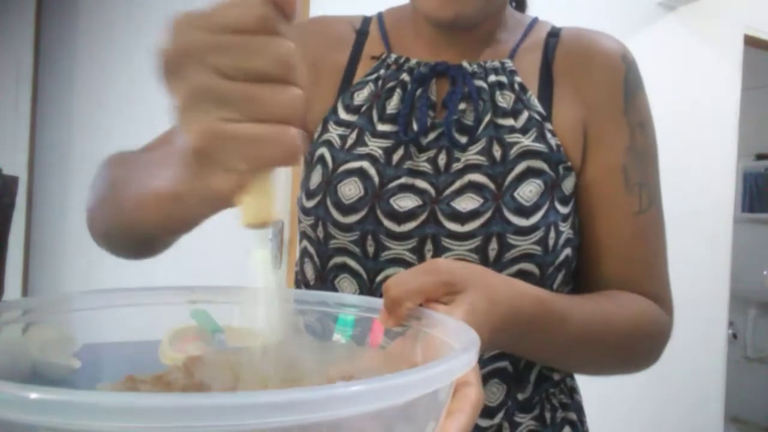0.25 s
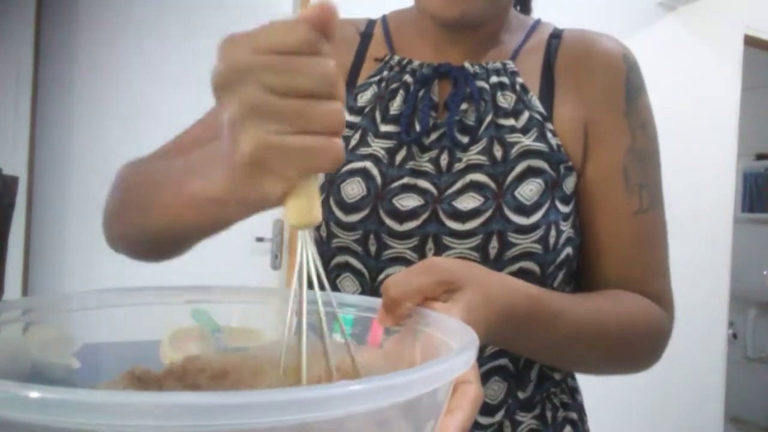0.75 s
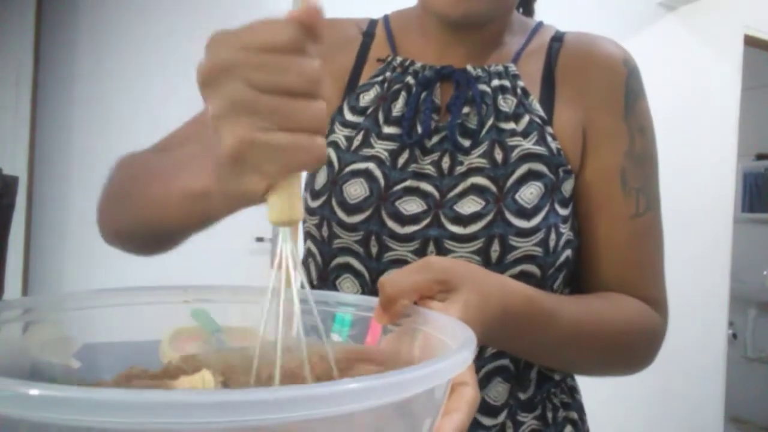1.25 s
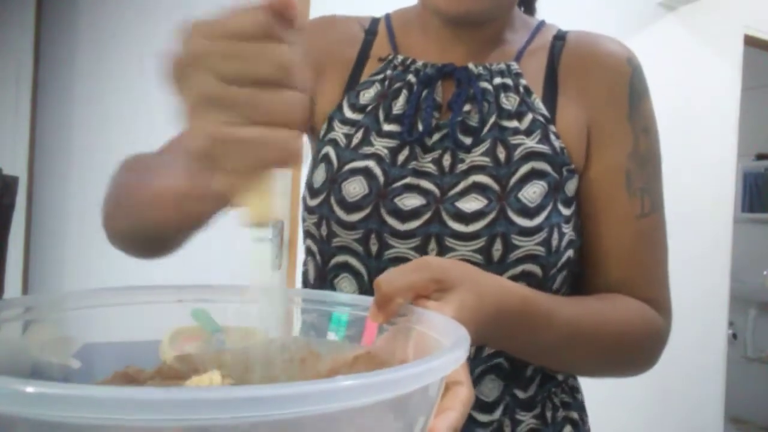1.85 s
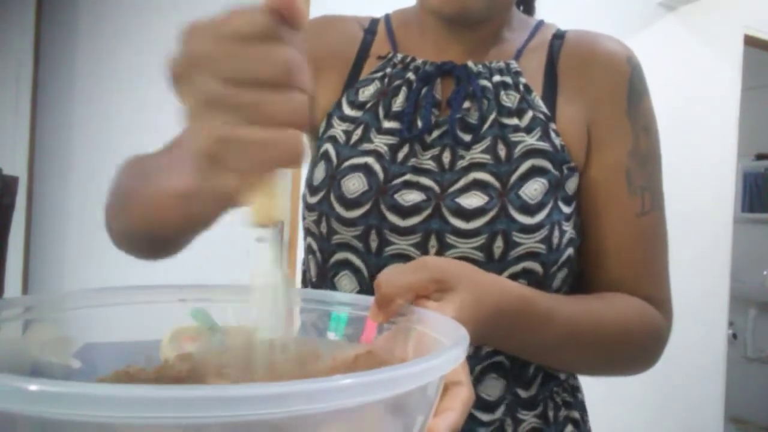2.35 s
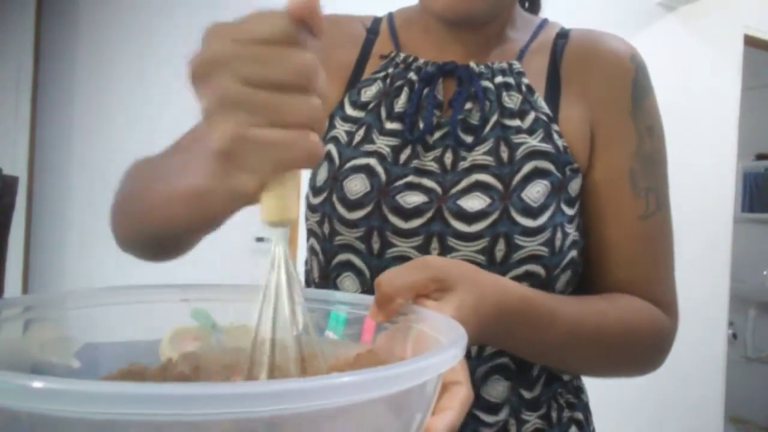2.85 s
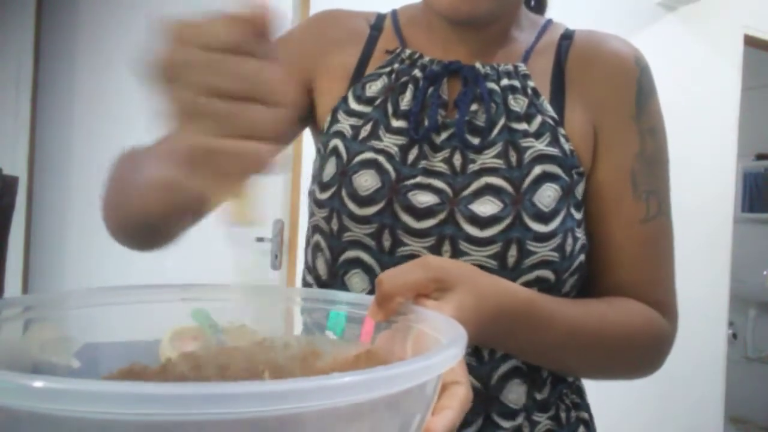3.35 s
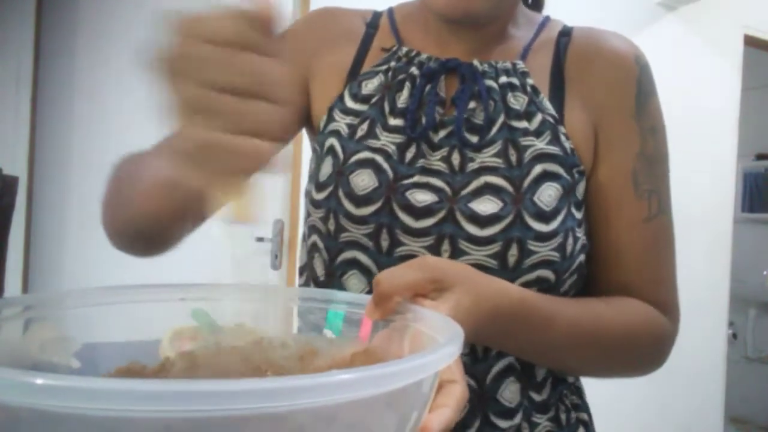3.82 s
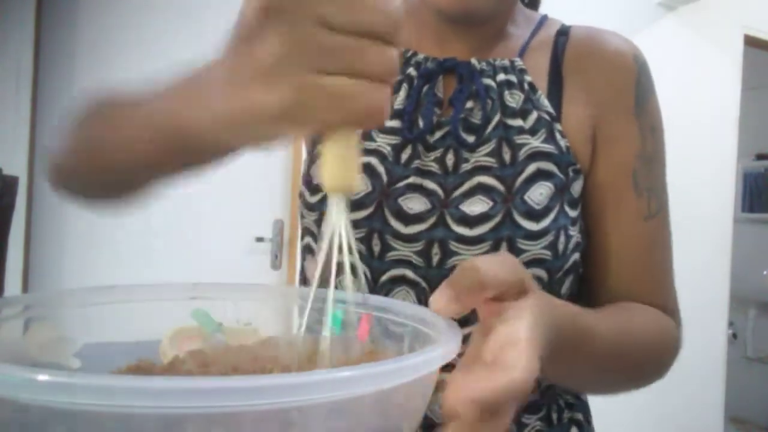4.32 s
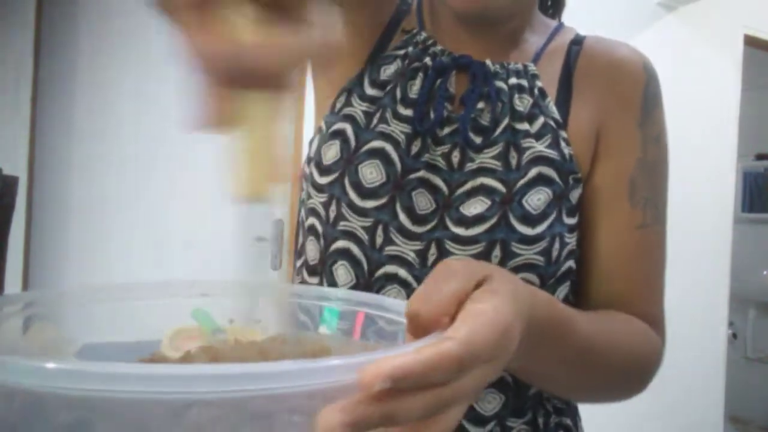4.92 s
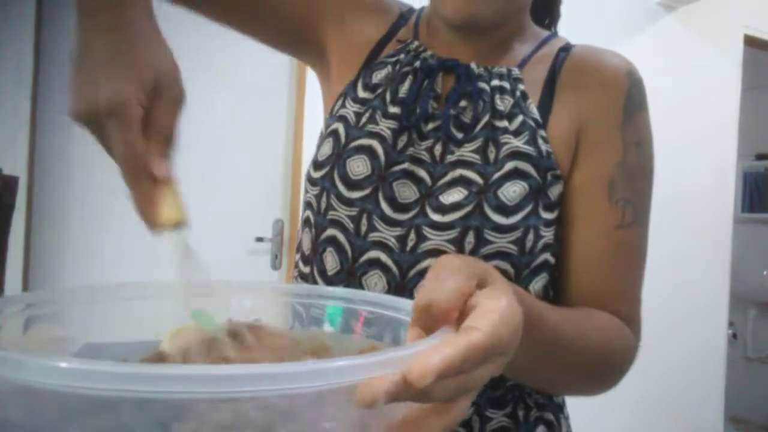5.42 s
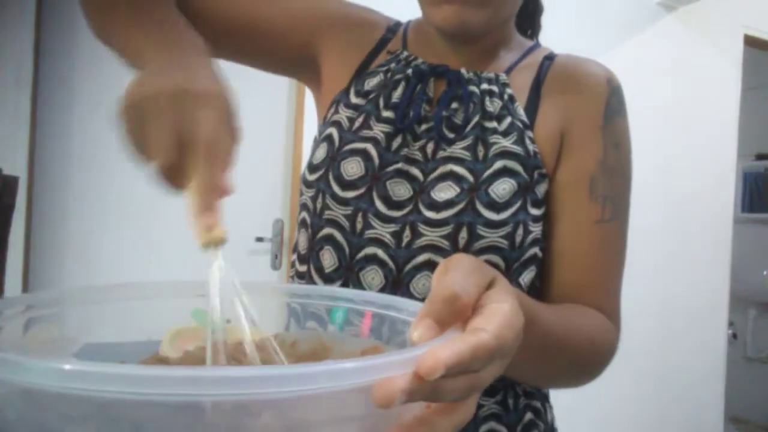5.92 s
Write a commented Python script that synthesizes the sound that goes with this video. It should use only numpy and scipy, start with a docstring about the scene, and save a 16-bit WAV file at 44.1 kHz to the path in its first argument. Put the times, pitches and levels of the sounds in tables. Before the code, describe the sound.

Hand whisking in a plastic bowl: bright metallic clicks, short hissing scrapes and dull hollow knocks, sparse at first, sharper and louder near the end.

```python
"""In a hard-walled kitchen, a wire whisk stirs batter in a plastic bowl close to a one-microphone camera.
Wires tick (shaped noise bursts) and scrape (uneven hiss) on the wall, which sings on one mode as it is rubbed;
the bowl knocks as decaying sines at its modes, and the room rings on as decaying noise.
Under it lie household noise and a mains hum that dies away. A noise suppressor pushes the noise down
and chops the tails; a noisy left-right difference is heard in the treble in random patches."""
import sys
import numpy as np
from scipy import signal
from scipy.fft import rfft, irfft
from scipy.io import wavfile
from scipy.ndimage import uniform_filter1d

SR = 44100
rng = np.random.default_rng(int(sys.argv[2]) if len(sys.argv) > 2 else 0)


def inscribe(sig):
    """Save sig as 16-bit PCM at rate SR to the path in sys.argv[1].

    A 1-D sig is mono; a 2-D sig holds one channel per row.
    Samples are clipped to [-1, 1] before scaling.
    """
    pcm = np.round(np.clip(np.atleast_2d(sig).T, -1, 1) * 32767)
    wavfile.write(sys.argv[1], SR, pcm.astype(np.int16))


def natural_amplitude(level_db):
    """Convert a level in decibels to a linear amplitude factor, elementwise."""
    exponent = np.asarray(level_db, float) / 20
    return 10 ** exponent


N = 272097
T = np.arange(N) / SR


def colour(x, points):
    """Linear filtering: weights the spectrum by (Hz, dB) points joined along log frequency."""
    hz, db = np.transpose(points)
    f = np.maximum(np.arange(len(x) // 2 + 1) * SR / len(x), 1)
    gain = natural_amplitude(np.interp(np.log(f), np.log(hz), db))
    return irfft(rfft(x) * gain, len(x))


def unit(x):
    """Normalisation of power: scales to rms 1."""
    return x / np.sqrt(np.mean(x ** 2))


def band(x, lo_hz, hi_hz, order=2):
    """Band limitation by a Butterworth filter."""
    edges = [lo_hz, min(hi_hz, SR / 2.2)]
    return signal.sosfilt(signal.butter(order, edges, "band", fs=SR, output="sos"), x)


def add(out, start_s, x):
    """Superposition: mixes x into out from start_s."""
    i = int(start_s * SR)
    out[i:i + len(x)] += x[:N - i]


def walk(rate):
    """Slow random modulation: chance levels held 1 / rate s and smoothed twice."""
    hold = int(SR / rate)
    steps = np.repeat(rng.standard_normal(N // hold + 1), hold)
    return uniform_filter1d(uniform_filter1d(steps, hold), hold)[:N]


def swells(start, length, db, rise_db_s, fall_db_s):
    """Exponential growth and decay: gain rises up to each start, holds its level for the length, then falls."""
    early = np.maximum(start[:, None] - T, 0)
    late = np.maximum(T - (start + length)[:, None], 0)
    return natural_amplitude(db[:, None] - rise_db_s * early - fall_db_s * late).sum(axis=0)


# Microphone and wire colour of ticks and scrape. Each row: frequency in Hz, relative level in dB.
WIRE_COLOUR = [(200, -74), (1500, -24.5), (2500, -16.5), (3500, -3.5), (5300, 4), (7000, -6), (10000, -13),
               (13000, -25.5), (16000, -33)]
# Wire contacts. Each row: time in seconds, peak of the direct sound in dB, relative room feed in dB,
# thinness as a tilt of the wire colour in dB per octave.
WIRE_TICKS = [(0.407, -32.5, -9, -6), (0.468, -33.5, -4, -4),  (0.665, -24, -7.5, -2),
              (0.779, -36, -1.5, -12), (1.5478, -31, -0.5, 2), (1.8189, -19, -48, -3),
              (1.8189, -18.5, -3, -2), (1.964, -32, -13, 2), (2.0624, -19, -0.5, -4.5),
              (2.074, -19, -28, -8.5),  (2.0798, -13, -25, -0.5),  (2.22, -21, -8.5, -4.5),
              (2.311, -18, -14, -3), (2.322, -18.5, -6.5, -1), (2.7902, -29, -6, -3),
              (2.803, -22.5, -8.5, 0), (2.822, -29, -4.5, 0.5), (3.11, -33, -8, 3), (3.163, -28.5, -6.5, 2),
              (3.1729, -30, -12, 7), (3.183, -31.5, -14, 4), (3.193, -35.5, -12, 7), (3.2077, -30, -18, 1),
              (3.3047, -31.5, -15, -1.5), (3.331, -36.5, -10, 0), (3.5504, -38.5, -18, -1),
              (3.6171, -36, -10, -1), (3.706, -32, -19, 6), (3.785, -30.5, -13.5, 7),
              (3.9693, -30.5, -0.5, -1), (4.0611, -20, -13, 6.5), (4.0775, -29, -6.5, -2),
              (4.339, -38, -39, 6.5), (4.4427, -19.5, -5, -3), (4.5804, -26.5, -9, -1.5),
              (4.601, -20.5, -7.5, 2.5), (4.6762, -5.5, -13, -3.5), (4.681, -15, -15, 1),
              (4.718, -20.5, -3.5, -12), (4.773, -25, -3, 0), (4.9045, -24.5, -14, 4),
              (5.1268, -47.5, -15, -33), (5.1293, -9, -20.5, 1), (5.1339, -13, -8.5, -3.5),
              (5.1988, -25.5, -3, 1), (5.3125, -24.5, -4.5, 1.5), (5.33, -21.5, -10, -5.5),
              (5.5023, -20.5, -5, -4.5), (5.6275, -36.5, -1.5, 1), (5.9086, -17, -3, -4.5),
              (6.1424, -30, -0.5, -1.5)]


def ticks():
    """Impact excitation: each contact is a snap with a fast decay, a faint noise heard just before it.
    Returns direct sound and room feed."""
    near, far = np.zeros(N), np.zeros(N)
    lead = 256 / SR  # seconds of faint noise ahead of the listed time
    t = T[:1024] - lead - 0.0015
    decay = np.exp(-np.abs(t) / 0.0005) + natural_amplitude(0.5) * np.exp(-np.abs(t) / 0.00054)
    faint_before = natural_amplitude(-7.5) * np.exp(t / 0.0025)
    shape = np.where(t > 0, decay, faint_before)
    hz, wire_db = np.transpose(WIRE_COLOUR)
    noises = rng.standard_normal((len(WIRE_TICKS), 1024))
    for (start, db, room_db, tilt_db), noise in zip(WIRE_TICKS, noises):
        tint = np.transpose([hz, wire_db + tilt_db * np.log2(hz / hz[0])])
        tick = colour(noise * shape, tint)
        tick = natural_amplitude(db) * tick / np.abs(tick).max()
        # the walls hear all directions: an even colour, from the phases alone
        phases_only = irfft(np.exp(1j * np.angle(rfft(tick))))
        even = unit(colour(phases_only, tint))
        # the first noise samples also set the chance levels of the loops
        rung = loops(tick, noise)
        add(near, start - lead, natural_amplitude(db) * rung / np.abs(rung).max())
        add(far, start - lead, natural_amplitude(room_db) * tick.std() * loops(even, noise))
    return near, far


# Modes of the whisk's wire loops. Each row: frequency in Hz, mean level in dB above the broad colour.
LOOP_MODES = [(3470, -28.5), (3770, -0.5), (4150, -4.5), (4600, -7.5), (5300, -3), (5620, -9), (6750, 0)]


def loops(x, chance):
    """Modal resonance: the wire loops ring briefly beside the broad colour; each contact favours other loops."""
    width_hz, scatter_db = 100, 3
    f = np.arange(len(x) + 1) * SR / len(x) / 2
    gain = 1
    for (hz, db), c in zip(LOOP_MODES, chance):
        gain = gain + natural_amplitude(db + scatter_db * c) / (1 + 2j * (f - hz) / width_hz)
    return irfft(rfft(x, 2 * len(x)) * gain * natural_amplitude(-4.5))


# Strokes of the wires along the wall. Each row: start in seconds, length in seconds, scrape level in dB,
# scrape centre in Hz, fizz level in dB.
WALL_STROKES = [(0.19, 0.092, -61, 5320, -62), (0.36, 0.12, -57.5, 5330, -63),
                (0.638, 0.06, -49, 5510, -64), (0.648, 0.051, -55.5, 3800, -78),
                (0.757, 0.21, -57, 5530, -59.5), (1.236, 0.11, -64, 5190, -66),
                (1.56, 0.11, -69, 5440, -65), (2.536, 0.086, -56, 5100, -65), (2.96, 0.062, -59, 4860, -63),
                (3.154, 0.1, -55, 5160, -63.5), (3.304, 0.26, -58.5, 4900, -64.5),
                (3.521, 0.42, -71.5, 4640, -75.5), (3.721, 0.13, -60, 5100, -69.5),
                (3.974, 0.066, -48.5, 4870, -56), (4.353, 0.061, -61, 5100, -69),
                (4.905, 0.036, -51.5, 2550, -98), (4.921, 0.178, -53, 5510, -62),
                (5.178, 0.23, -48, 5050, -65), (5.697, 0.094, -62, 5300, -65),
                (5.855, 0.11, -54, 5250, -58.5), (6.023, 0.16, -60, 5230, -65.5)]


def scrape():
    """Friction noise: dense uneven slips of wire on plastic; each stroke has its own hiss pitch, batter fizz on top."""
    rise_db_s, fall_db_s = 422, 195
    drop_db = 76  # one octave away from the scrape centre
    start, length, db, centre_hz, fizz_db = np.transpose(WALL_STROKES)
    uneven = np.minimum(rng.exponential(size=N // 16 + 1), 4).repeat(16)[:N]
    slips = rng.standard_normal(N) * natural_amplitude(3.84 * uneven)
    # each 400 Hz band flickers by itself
    slips = unit(sum(natural_amplitude(1.8 * walk(16)) * band(slips, f, f + 400) for f in np.arange(1800, 15500, 400)))
    # the fizz is brighter than the wire colour
    fizz = unit(colour(colour(slips, WIRE_COLOUR), [(5000, -16.5), (7500, 5.5), (16000, 11.5)]))
    out = fizz * swells(start, length, fizz_db, rise_db_s, fall_db_s)
    octaves = np.linspace(-2, 2, 33)
    for k in range(len(start)):
        first = max(int((start[k] - 0.2) * SR), 0)
        part = slice(first, int((start[k] + length[k] + 0.3) * SR))
        hump = np.transpose([centre_hz[k] * 2 ** octaves, -drop_db * octaves ** 2])
        hiss = unit(colour(slips[part], hump))
        one = slice(k, k + 1)
        press = swells(start[one], length[one], db[one], rise_db_s, fall_db_s)
        out[part] += hiss * press[part]
    return out


# Modes of the bowl. Each row: mean frequency in Hz, relative level in dB, t60 in seconds.
BOWL_MODES = [(370.7, 6.5, 0.041), (455, 11.5, 0.063), (540, -3, 0.15), (624.7, 9.5, 0.043),
              (672.7, -1, 0.055), (779.6, -3, 0.21), (900.3, 20.5, 0.037), (1325, 4, 0.05),
              (1521, 24, 0.014), (1780, 18.5, 0.01), (1930, 13.5, 0.027), (2148, 2, 0.14), (2259, 9, 0.019),
              (2708, 11, 0.029), (2810, 17, 0.032)]
# Knocks on the bowl. Each row: time in seconds, relative level of the low modes in dB, low centre in Hz,
# relative level of the upper modes and rattle in dB, upper centre in Hz.
BOWL_KNOCKS = [(0.407, -45, 380, -57, 1890), (0.655, -52, 1026, -48.5, 2040), (1.546, -44, 700, -54, 2900),
               (1.819, -32.5, 719.5, -43.5, 1460), (1.954, -39.5, 604, -46, 1146),
               (2.079, -39, 678, -51.5, 1700), (2.228, -42.5, 660, -47, 1290), (2.311, -45, 510, -40, 1810),
               (2.323, -36.5, 660, -81, 2120), (2.803, -36, 547, -43, 1960), (3.04, -48, 455, -52, 1470),
               (3.193, -41, 560, -47, 1060), (3.298, -43, 700, -57, 2360), (3.617, -38.5, 558, -50, 1630),
               (3.67, -44.5, 724, -56, 2050), (4.056, -45.5, 726, -47, 2050), (4.444, -33, 571, -51, 2440),
               (4.603, -46.5, 450, -47, 1610), (4.677, -31, 712, -38, 2120), (4.903, -45.5, 605, -40, 2620),
               (5.019, -45, 725, -46.5, 2560), (5.128, -30, 393, -30.5, 1870),
               (5.329, -46.5, 540, -43, 1980), (5.502, -40.5, 777, -45, 1780),
               (5.629, -48.5, 653, -50.5, 1540), (5.911, -30.5, 540, -29, 1750), (6.01, -46, 538, -51, 950)]


def knocks():
    """Modal excitation: the spot struck decides which wall modes ring, those near its low and upper centres."""
    out, t = np.zeros(N), T[:8192]
    hz, mode_db, t60 = np.array(BOWL_MODES).T[:, :, None]
    chances = rng.standard_normal((len(BOWL_KNOCKS), 2, len(BOWL_MODES), 1))
    noises = rng.standard_normal((len(BOWL_KNOCKS), len(t)))
    push = 1 - np.exp(-t / 0.001)  # batter softens the contact
    for (start, db, low_hz, up_db, up_hz), (detune, scatter), noise in zip(BOWL_KNOCKS, chances, noises):
        low = natural_amplitude(db - 1.5) * np.exp(-(np.log(hz / low_hz) / 0.16) ** 2)
        upper = natural_amplitude(up_db - 10) * np.exp(-(np.log(hz / up_hz) / 0.3) ** 2)
        level = (low + upper) * natural_amplitude(mode_db + 2.0 * scatter)
        rings = np.sin(2 * np.pi * hz * (1 + 0.019 * detune) * t) * np.exp(-np.log(1000) * t / t60)
        # the wires rattle briefly against the wall around the upper centre
        rattle = natural_amplitude(up_db + 13) * band(noise * np.exp(-t / 0.005), up_hz / 1.85, up_hz * 1.87)
        add(out, start, push * (np.sum(level * rings, axis=0) + rattle))
    return band(out, 347, 6800, order=3)  # a small bowl radiates little bass


# Singing of the rubbed wall. Each row: start in seconds, length in seconds, rms level in dB before flutter.
WALL_SINGS = [(0.241, 0.022, -57), (0.905, 0.09, -59), (1.385, 0.032, -58), (1.545, 0.12, -58.5),
              (2.225, 0.066, -52), (2.794, 0.13, -55.5), (3.488, 0.058, -53.5), (3.777, 0.17, -58),
              (3.986, 0.34, -59), (4.89, 0.07, -52), (5.123, 0.12, -52.5), (5.8, 0.13, -57.5)]


def sing():
    """Stick-slip self-oscillation: rubbing keeps one mode going; pitch wavers slightly, the level flutters."""
    centre_hz, waver_hz = 1362, 8
    phase = 2 * np.pi * np.cumsum(centre_hz + waver_hz * walk(30)) / SR
    tone = np.sqrt(2) * np.sin(phase)
    level = swells(*np.transpose(WALL_SINGS), rise_db_s=600, fall_db_s=191)
    return tone * level * natural_amplitude(1.5 * walk(50))


# Decay of the room. Each row: frequency in Hz, t60 in seconds.
ROOM_DECAY = [(300, 0.41), (1000, 0.68), (3000, 0.62), (6000, 0.42), (12000, 0.97)]


def room(x):
    """Diffuse reverberation: a noise tail dies at its own rate in each octave, building up over a few ms."""
    hz, t60 = np.transpose(ROOM_DECAY)
    t, tail = T[:SR // 2], 0
    for f in 250 * 2. ** np.arange(7):
        decay = np.exp(-np.log(1000) * t / np.interp(np.log(f), np.log(hz), t60))
        tail = tail + band(rng.standard_normal(len(t)), f / np.sqrt(2), f * np.sqrt(2)) * decay
    tail = tail * (1 - np.exp(-t / 0.0045))
    return signal.fftconvolve(x, tail / np.sqrt(np.sum(tail ** 2)))[:N]


# Colour of the household noise. Each row: frequency in Hz, relative level per Hz in dB.
HOUSE_COLOUR = [(40, -10.5), (150, -25.5), (330, -3), (460, -2.5), (1000, -4), (2000, -8), (5000, -14.5),
                (6500, -18), (8000, -25), (11500, -34.5), (16000, -43)]
# Mains hum, which wavers and then dies away. Each row: time in seconds, peak level in dB.
HUM_LEVEL = [(0, -70.5), (.9, -72), (1.2, -71.5), (1.9, -65.5), (2.25, -72), (2.45, -80), (6.17, -105)]


def house():
    """Stationary broadband noise of distant appliances and street, with a faint mains hum at 120 Hz."""
    noise_db = -48.5 + 0.5 * rng.standard_normal()  # one chance level throughout
    noise = unit(colour(rng.standard_normal(N), HOUSE_COLOUR)) * natural_amplitude(noise_db)
    hum = natural_amplitude(np.interp(T, *np.transpose(HUM_LEVEL))) * np.sin(2 * np.pi * 120 * T)
    return noise + hum


def scene():
    """Superposition at one point: the microphone hears direct sounds, room and household together."""
    near, far = ticks()
    bowl, drag = knocks(), scrape()
    reverb = room(natural_amplitude(8.5) * far + bowl + natural_amplitude(-11.5) * drag)
    mono = near + bowl + drag + sing() + reverb + house()
    return np.array([mono, mono])


def suppress(x):
    memory, release, floor_db = 0.97, 0.85, -18  # memory and release are factors per frame
    z = signal.stft(x, nperseg=384, noverlap=192)[2]
    power = np.abs(z) ** 2
    smooth = uniform_filter1d(power, size=11, axis=1)
    quiet = 0.95 * np.percentile(smooth, 15, axis=1) + 1e-18
    gain, last, held = np.empty(power.shape), 0, 0
    for i, ratio in enumerate(power.T / quiet):
        snr = memory * last + (1 - memory) * np.maximum(ratio - 1, 0)
        wiener = snr / (1 + snr)
        last = wiener ** 2 * ratio
        held = np.maximum(wiener, release * held)
        gain[:, i] = np.maximum(held, natural_amplitude(floor_db))
    return signal.istft(z * gain, nperseg=384, noverlap=192)[1][:N]


# Noisy left-right difference. Each row: frequency in Hz, level in dB relative to the middle.
SIDE_COLOUR = [(3000, -58), (4600, -15.5), (9000, -4)]


def side_noise(x):
    """Noise modulated by the signal: a noisy left-right difference, heard in the treble in random patches."""
    patch = SR // 16  # samples
    on = (rng.random(N // patch + 1) < 0.25).repeat(patch)[:N]
    on = uniform_filter1d(1. * on, size=256)
    noisy = signal.fftconvolve(x, rng.standard_normal(64) / 8)[:N]
    return on * colour(noisy, SIDE_COLOUR)


def low_pass(x):
    """Removes everything above the highest recorded frequency."""
    return signal.sosfilt(signal.butter(12, 16480, fs=SR, output="sos"), x)


def record(dry):
    """Cascaded filtering: thin microphone bass, noise suppressor and band limit; then side noise is added."""
    thin = signal.sosfilt(signal.butter(3, 150, "high", fs=SR, output="sos"), dry[0])
    band_limit = signal.ellip(8, 0.2, 70, 16200, fs=SR, output="sos")
    middle = signal.sosfilt(band_limit, suppress(thin))
    finished = middle + np.array([[1], [-1]]) * side_noise(middle)  # opposite signs left and right
    return low_pass(finished)


dry = scene()
out = record(dry)
inscribe(out)
```